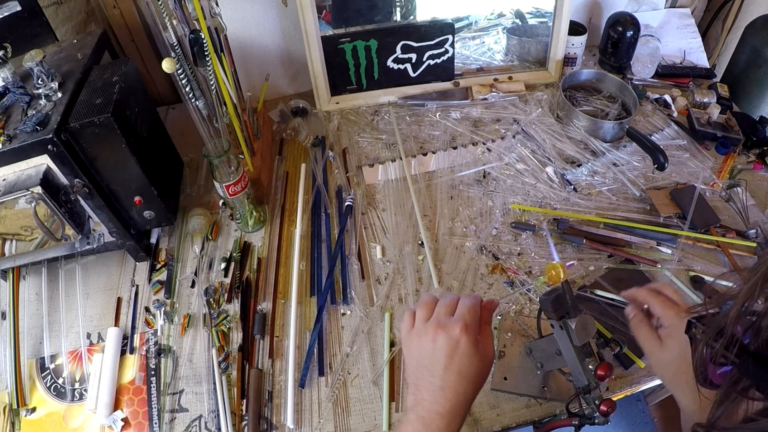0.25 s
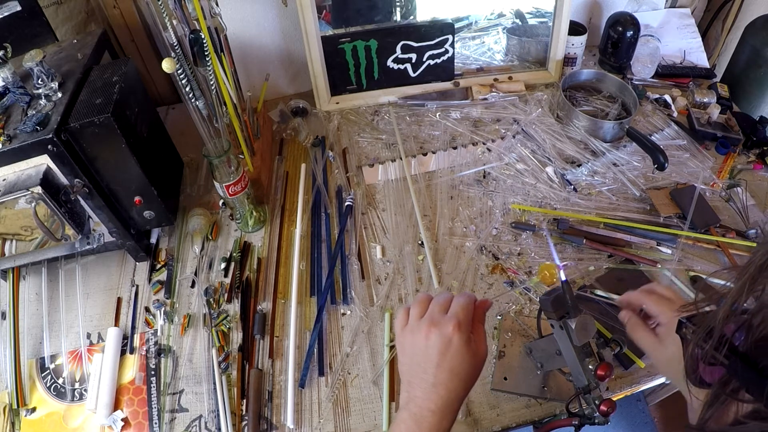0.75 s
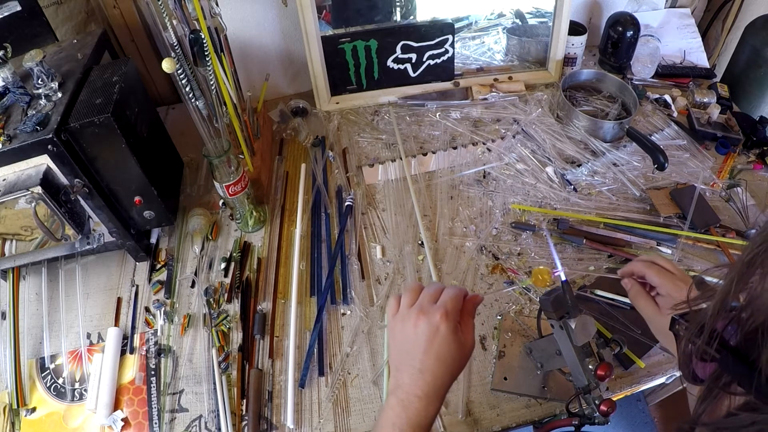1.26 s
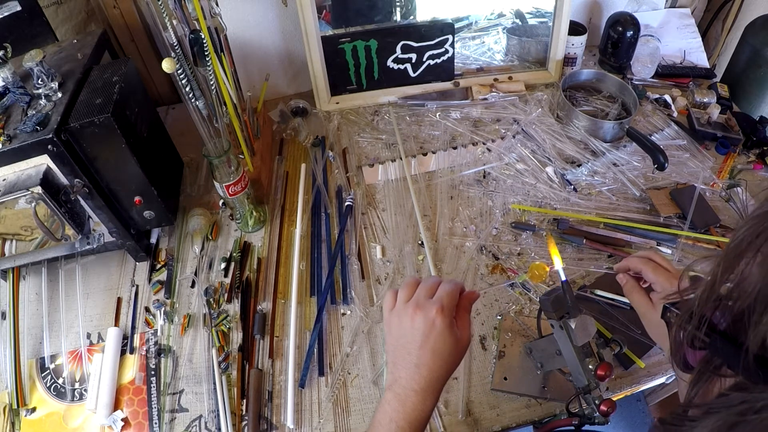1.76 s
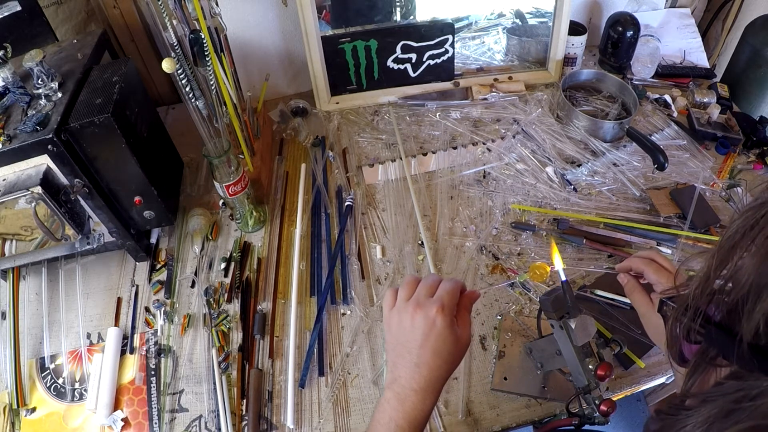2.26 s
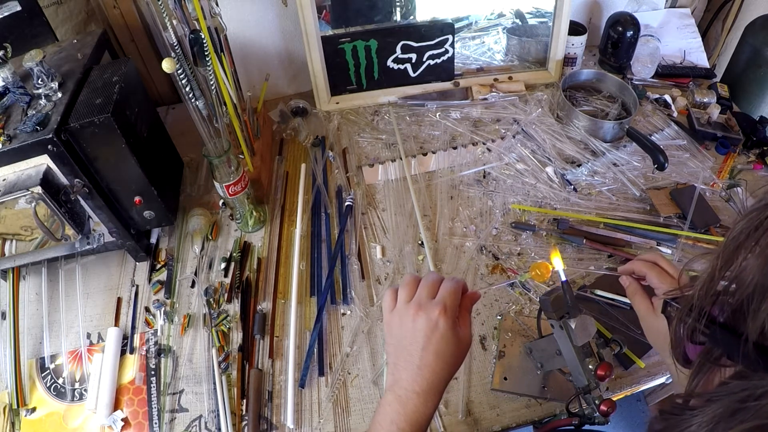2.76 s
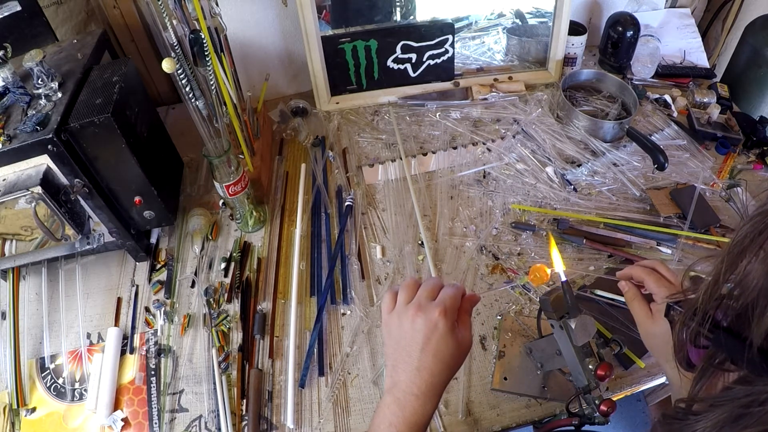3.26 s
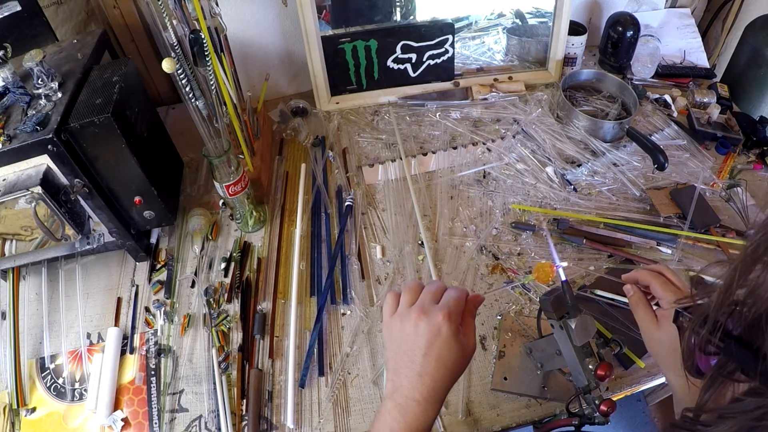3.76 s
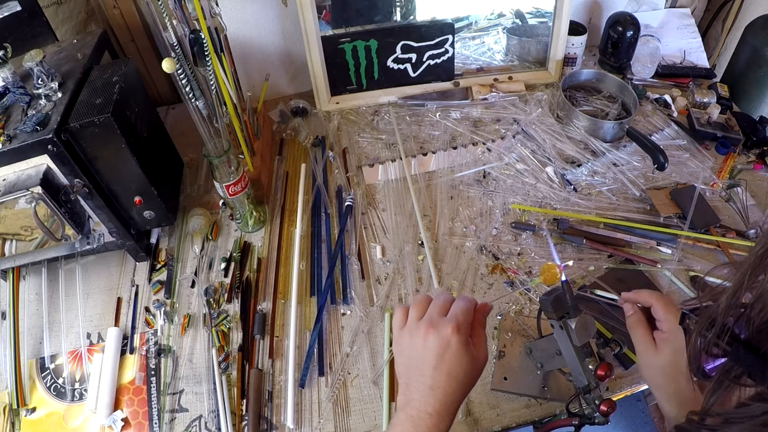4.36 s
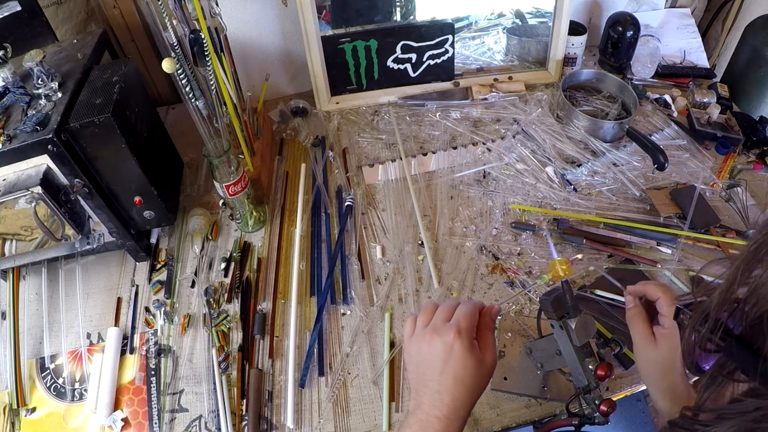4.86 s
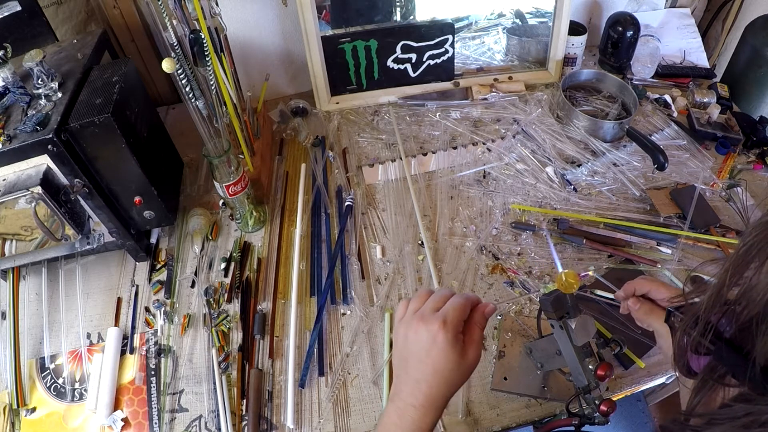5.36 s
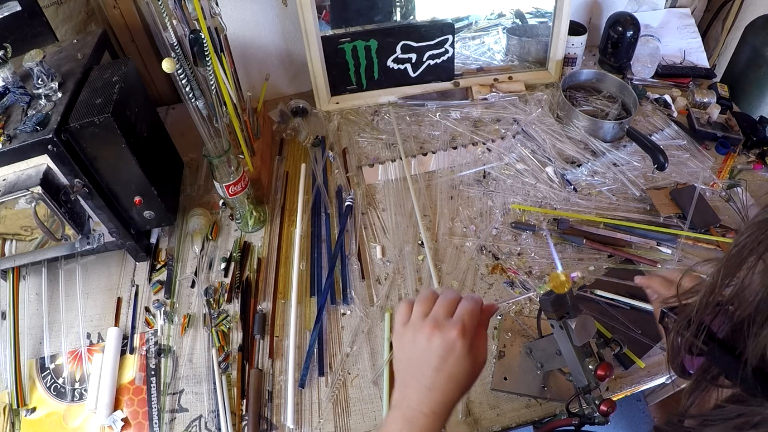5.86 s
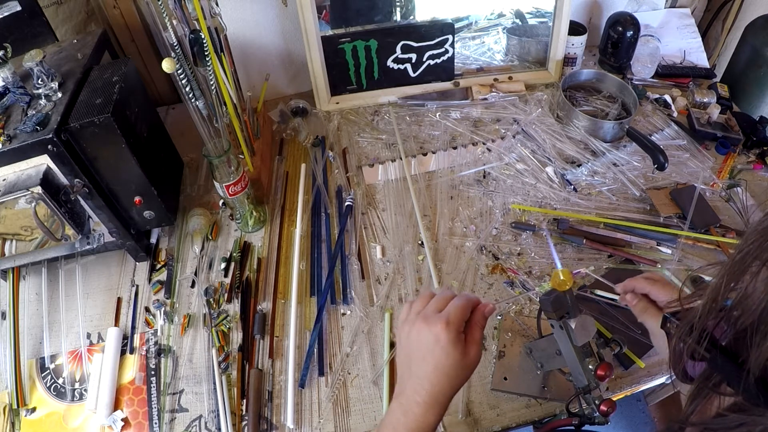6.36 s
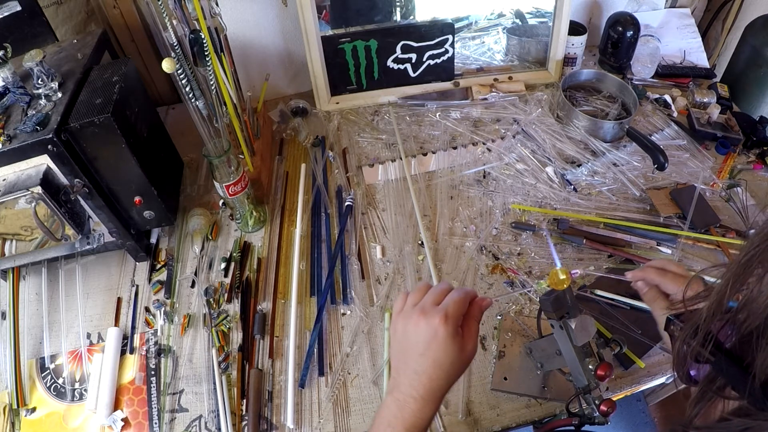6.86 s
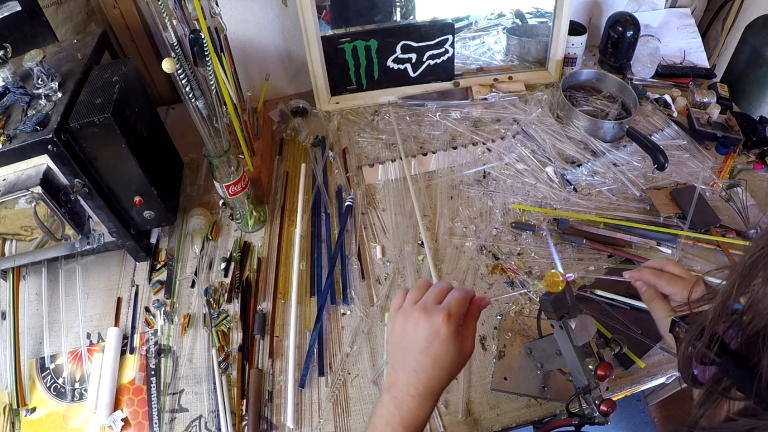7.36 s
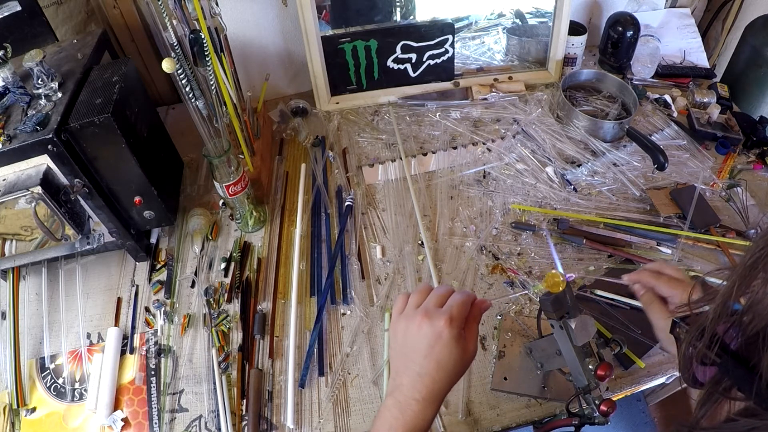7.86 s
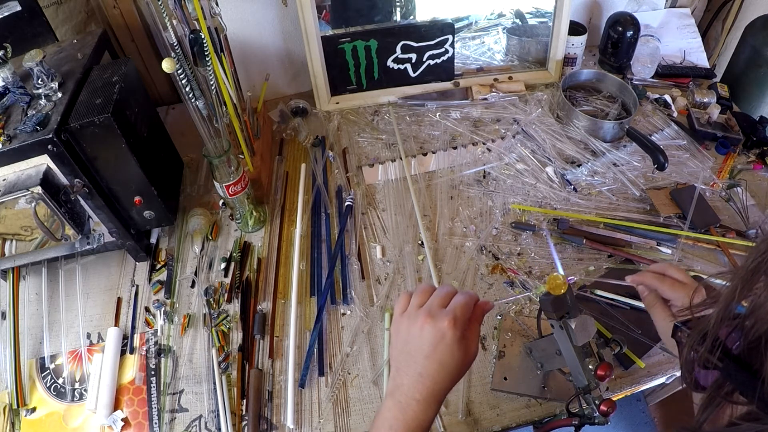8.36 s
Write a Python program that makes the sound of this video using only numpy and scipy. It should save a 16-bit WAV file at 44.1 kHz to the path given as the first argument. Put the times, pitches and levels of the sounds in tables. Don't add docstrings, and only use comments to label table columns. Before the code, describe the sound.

A bench torch hisses steadily over a low extractor fan hum; one sharp glass crack, then faint high clinks of thin glass rods.

```python
import sys
import numpy as np
from scipy import signal
from scipy.fft import rfft, irfft, next_fast_len
from scipy.io import wavfile

SR = 44100
rng = np.random.default_rng(int(sys.argv[2]) if len(sys.argv) > 2 else 0)


def dump(signal):
    limited = np.clip(np.atleast_2d(signal).T, -1, 1)
    pcm = np.round(limited * 32767).astype(np.int16)
    wavfile.write(sys.argv[1], SR, pcm)


def boost_factor(decibels):
    exponent = np.asarray(decibels, float) / 20
    return 10 ** exponent


N = 380583


def evened(x):
    return x / np.sqrt(np.mean(x ** 2) + 1e-20)


def read(points, hz):
    f, value = np.transpose(points)
    return np.interp(np.log(hz + 1), np.log(f + 1), value)


def add(mix, start_s, sound):
    part = mix[round(start_s * SR):][:len(sound)]
    part += sound[:len(part)]


def drift(top_hz):
    t = np.arange(0, N + 512, 256) / SR
    slow = 0
    for f in np.geomspace(top_hz / 30, top_hz, num=24):
        slow = slow + np.sin(2 * np.pi * (f * t + rng.random())) / np.sqrt(f)
    return np.interp(np.arange(N) / SR, t, evened(slow))


def air(spectrum, resonances):
    size = next_fast_len(N)
    hz = np.fft.rfftfreq(size, 1 / SR)
    lift_db = sum(db * np.exp(-np.log(16) * ((hz - f) / width_hz) ** 2) for f, width_hz, db in resonances)
    noise = rfft(rng.standard_normal(size))
    return evened(irfft(noise * boost_factor(read(spectrum, hz) + lift_db), size)[:N])


def freedom():
    freed_s, spin_up_s = 2.18, .2
    loaded_again_s, spin_down_s = 8.02, .3
    t = np.arange(N) / SR
    spin_up = 1 - np.exp(-np.maximum(t - freed_s, 0) / spin_up_s)
    return spin_up * np.exp(-np.maximum(t - loaded_again_s, 0) / spin_down_s)


def airflow_db():
    free_db, build_db_per_s = 0.5, 0.2257
    return free_db * freedom() + build_db_per_s * np.arange(N) / SR


def fan():
    # (multiple of blade rate, level [dB rms])
    blade_tones = [(1 / 3, -55), (1 / 2, -50.5), (1, -47), (5 / 4, -56), (2, -36), (3, -62), (4, -66.5)]
    # (multiple of hum, multiple of blade rate, level [dB rms])
    hum_tones = [(1 / 2, 0, -54.5), (1, 0, -41.5), (3, 0, -60), (1, 2, -67), (2, 0.98, -68)]
    # (frequency [Hz], density [dB per Hz])
    rumble = [(15, -5.5), (25, -2.5), (45, -1), (70, -9.5), (130, -9), (170, -12), (238, -8), (262, -18.5),
              (385, -21), (600, -30), (900, -60)]
    # (frequency [Hz], width [Hz], lift [dB])
    room_modes = [(38, 6.8, -0.5), (55.7, 8, 2), (103.8, 31, 9), (182, 26, 0.5), (289.3, 21.5, 8),
                  (306, 9.8, 2.5), (346, 22, 4), (422, 35.6, 8), (455, 18, 4.5)]
    hum_hz, rumble_db = 120.2, -36
    loaded_hz, free_hz = 219.0, 221.5

    blade_hz = (loaded_hz + (free_hz - loaded_hz) * freedom()) / 2
    blade = 2 * np.pi * np.cumsum(blade_hz) / SR
    hum = 2 * np.pi * hum_hz * np.arange(N) / SR
    tones = np.zeros(N)
    for k, db in blade_tones:
        tones += boost_factor(db + 0.3 * drift(5.2)) * np.sin(k * blade + 2 * np.pi * rng.random())
    for j, k, db in hum_tones:
        tones += boost_factor(db + 0.27 * drift(2.3)) * np.sin(j * hum + k * blade + 2 * np.pi * rng.random())
    flow_db = 0.23 * airflow_db() + 0.47 * drift(5.0)
    return np.sqrt(2) * tones + boost_factor(rumble_db + flow_db) * air(rumble, room_modes)


def flame():
    # (frequency [Hz], density [dB per Hz])
    jet = [(300, -20), (480, 0), (600, -3), (1000, -2.5), (1100, -5.5), (2150, -8), (2700, -9.5),
           (4000, -14.5), (4200, -14.5), (6200, -28.5), (7500, -33.5), (11000, -41), (14900, -52),
           (15300, -56)]
    # (frequency [Hz], width [Hz], lift [dB])
    body = [(536, 22, 3), (760, 82, 2), (874, 27, 3), (985, 34, 3), (1048, 17, 5), (1128, 30, 5),
            (1270, 33, 0.5), (1337, 52, 4.5), (1585.7, 50, 0), (1738, 71, 5), (1810, 50, 0.5),
            (1942, 133, 4.5), (2115, 25, 2), (2234, 52, 7), (2311, 66, 12), (2359, 53, 1.5),
            (2424, 29, 9.5), (2495, 42, 1.5), (2580, 133, 5.5), (2760, 120, 0), (3310, 30, 6),
            (3935, 270, 3.5), (4131.2, 80, -0.5), (4450, 46, 2.5), (4800, 80, 1), (10330, 80, 0.5)]
    jet_db = -46
    flutter_db = 0.53 * airflow_db() + 0.25 * drift(4.3) + .5 * drift(40.0)
    return boost_factor(jet_db + flutter_db) * air(jet, body)


def whistles():
    # (frequency [Hz], width [Hz], level [dB rms], fading [dB per s])
    orifices = [(8700, 150, -83.5, 0), (9780, 150, -86, 0.3), (11980, 180, -90, .6)]
    thin_s, thin_db = 4.8, 4.0
    t = np.arange(N) / SR
    total = np.zeros(N)
    for f, width_hz, db, fade in orifices:
        inner_hz, outer_hz = .4 * width_hz, 1.5 * width_hz
        band = [(f - outer_hz, -40), (f - inner_hz, 0), (f + inner_hz, 0), (f + outer_hz, -40)]
        level_db = db - fade * t - thin_db * np.clip(t - thin_s, 0, 1) + 1.2 * drift(8.0)
        total += boost_factor(level_db) * air(band, [])
    return total


def tick(db, hz, slide_s):
    t = np.arange(4096) / SR
    width_hz = .55 * hz
    t60_s = .03 + 2.5 * slide_s
    grit_db = 2.3 * np.minimum(rng.exponential(1, len(t)), 4)
    grit = rng.standard_normal(len(t)) * boost_factor(grit_db)
    band = 1 / (1 + ((np.fft.rfftfreq(len(t), 1 / SR) - hz) / width_hz * 1.6) ** 2)
    shape = np.minimum(t / .0003, 1) * boost_factor(-60 * np.maximum(t - slide_s, 0) / t60_s)
    return boost_factor(db) * evened(irfft(rfft(grit) * band)) * shape


def crack():
    # (delay [s], gain)
    surfaces = [(.00041, 0.33), (.0013, -0.0064), (.0031, 0.32), (.0035, 0.35), (.004, 0.35), (.006, 0.051),
                (.0064, .25), (.0068, 0.26), (0.012, .15)]
    # (frequency [Hz], t60 [s])
    tail_t60 = [(1000, 0.064), (3000, 0.079), (6000, 0.16), (12000, 0.074)]
    # (frequency [Hz], level [dB])
    tail_colour = [(800, 7), (2500, 3), (5000, -1), (7000, -4), (9500, 0.5), (14000, -2.5)]
    crack_db, tail_db = -11, -4.5
    push_s, pull_s = .000027, .00007

    t = np.arange(100) / SR
    push = np.exp(-((t - .0001) / push_s) ** 2)
    pull = np.exp(-((t - .00022) / pull_s) ** 2)
    late_pull = 0.11 * np.exp(-((t - .00036) / 0.0001) ** 2)
    spike = boost_factor(crack_db) * (push - pull * push.sum() / pull.sum() - late_pull)

    taps = np.zeros(SR // 4)
    at = np.arange(60, len(taps) - 8, 8) + rng.integers(0, 8, (len(taps) - 61) // 8)
    taps[at] = rng.choice([-1., 1.], len(at))
    hz, t, z = signal.stft(taps, SR, nperseg=128)
    decay_db = -60 * t / read(tail_t60, hz)[:, None]
    z *= boost_factor(read(tail_colour, hz)[:, None] + decay_db) * np.minimum(t / 0.0019, 1)
    room = signal.istft(z, SR, nperseg=128)[1]
    room *= boost_factor(tail_db) / np.linalg.norm(room)

    for delay_s, gain in surfaces:
        dulled = signal.windows.hann(11 if delay_s > .002 else 3)[1:-1]
        add(room, delay_s, gain * dulled / dulled.sum())
    room[0] += 1
    return signal.fftconvolve(spike, room)


def clink(db, hz):
    t = np.arange(4096) / SR
    t60_s = max(.06 - .003 * (db + 62), .015)
    pair = np.sin(2 * np.pi * hz * t) + .5 * np.sin(2 * np.pi * (1.3 * hz * t + rng.random()))
    return boost_factor(db - 60 * t / t60_s) * np.minimum(t / .0005, 1) * pair


def scene():
    # (time [s], level before the envelope [dB rms], centre [Hz], sliding time [s])
    rod_contacts = [(.428, -72.5, 10500, .006), (2.251, -67, 10300, .004), (2.256, -64, 11000, .005),
                    (2.275, -67, 12000, .012), (3.671, -61, 11500, .004), (3.682, -62, 10500, .004),
                    (3.701, -59, 9000, .001), (3.710, -66, 11000, .022), (3.737, -64.5, 12000, .003),
                    (3.872, -68.5, 11000, .004), (7.085, -69.5, 10500, .012), (7.115, -70, 12000, .003),
                    (7.560, -71, 10800, .022), (8.015, -64, 10000, .003), (8.028, -51, 10800, .002),
                    (8.029, -55, 5200, .002), (8.033, -60, 11000, .008), (8.049, -65, 11000, .005)]
    # (time [s], peak level [dB], frequency [Hz])
    rod_rings = [(2.251, -63, 9650), (2.251, -64, 11250), (2.256, -61, 14300), (2.256, -65, 13000),
                 (2.261, -57, 6200), (2.266, -65, 10800), (2.276, -65, 14300), (2.276, -65, 13400),
                 (2.280, -66, 8500), (8.016, -61, 9900), (8.0285, -50, 9000), (8.029, -58, 12500),
                 (8.033, -62, 14800)]
    crack_s = 1.66525
    mix = fan() + flame() + whistles()
    for start_s, db, hz, slide_s in rod_contacts:
        add(mix, start_s, tick(db, hz, slide_s))
    add(mix, crack_s, crack())
    for start_s, db, hz in rod_rings:
        add(mix, start_s, clink(db, hz))
    return mix[None]


def roll_off(x):
    return signal.sosfilt(signal.butter(12, 15300, fs=SR, output="sos"), x)


def record(dry):
    # (frequency [Hz], share [0-1])
    lost_share = [(12000, 0), (12700, .05), (13200, .18), (14000, .22), (14900, .34), (15300, .55)]
    lowpass = signal.firwin(129, 15250, window=("kaiser", 6), fs=SR)
    limited = signal.oaconvolve(dry, lowpass[None], "same")
    hz, t, z = signal.stft(limited, SR, nperseg=1024)
    draws = rng.random((len(t) // 3 + 1, len(hz) // 3 + 1))
    chance = np.kron(draws, np.ones((3, 3)))[:len(t), :len(hz)].T
    treble = abs(z[0, hz > 11000]).mean(0)
    weak = treble < 1.5 * np.median(treble)
    lost = (chance < read(lost_share, hz)[:, None]) & weak
    holed = signal.istft(z * np.where(lost, .05, 1), SR, nperseg=1024)[1][:, :N]
    return roll_off(holed)


dry = scene()
out = record(dry)
dump(out)
```